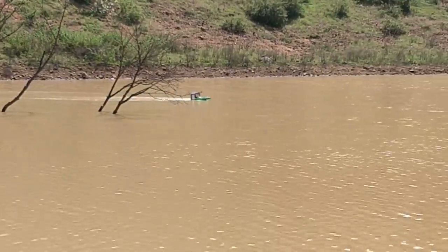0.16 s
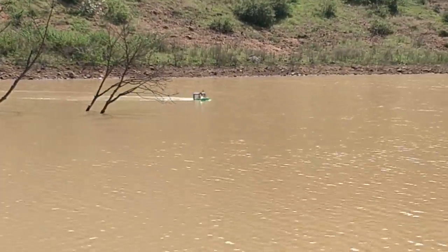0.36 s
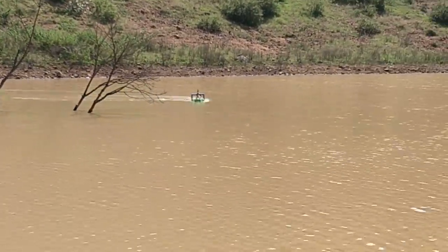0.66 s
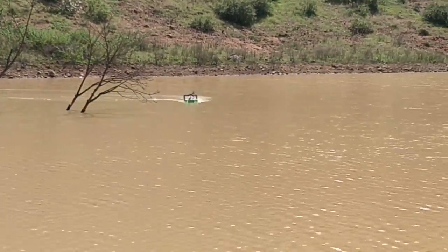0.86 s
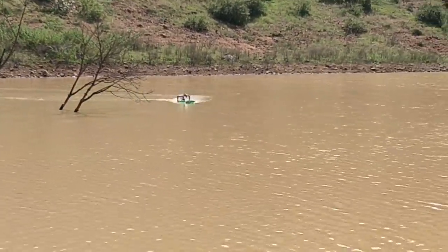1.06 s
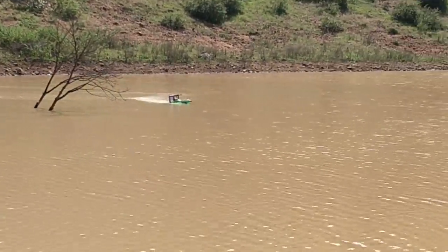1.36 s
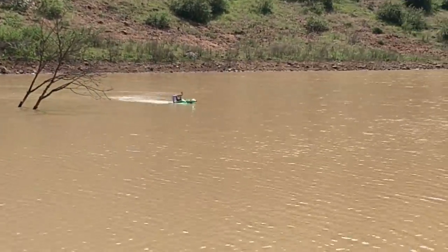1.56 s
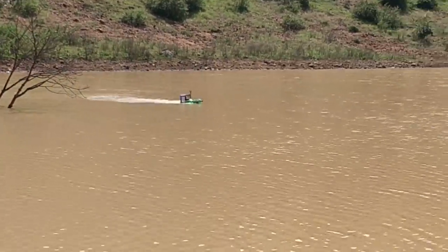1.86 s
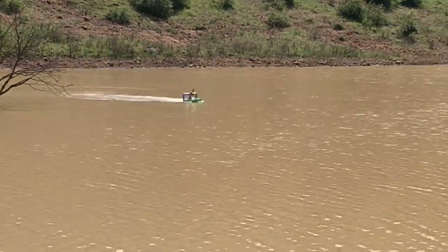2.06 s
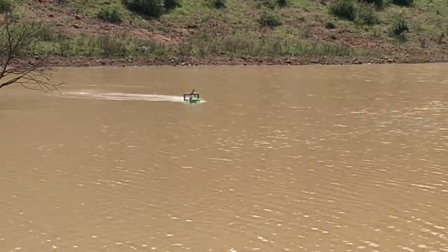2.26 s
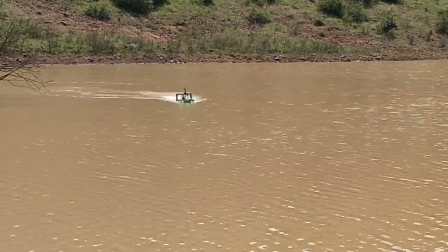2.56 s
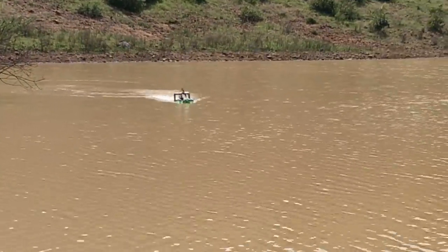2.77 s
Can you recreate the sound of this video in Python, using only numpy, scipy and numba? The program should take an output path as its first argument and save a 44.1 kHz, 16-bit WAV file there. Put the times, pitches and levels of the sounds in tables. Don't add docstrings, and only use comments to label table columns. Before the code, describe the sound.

From the start, a far-off model boat gives a steady electric whine and raspy propeller buzz with airy hiss, shimmering across open water. Pitch climbs slightly from about 0.5 to 2 seconds and loudness grows unevenly, then the speed holds. Small wind flicks touch either side early on; from about 2 seconds gusts thud, with a pop near 2.3 and a rough tear near 2.7.

```python
import sys
import numpy as np
from scipy import signal
from scipy.fft import rfft, irfft, next_fast_len
from scipy.io import wavfile
from scipy.ndimage import uniform_filter1d
from numba import njit

SR = 44100
rng = np.random.default_rng(int(sys.argv[2]) if len(sys.argv) > 2 else 0)


def gain_from_db(level_db):
    decades = np.asarray(level_db, float) / 20
    return 10 ** decades


def bounce(signal):
    frames = np.transpose(np.atleast_2d(signal))
    limited = np.clip(frames, -1, 1)
    pcm = np.round(limited * 32767).astype(np.int16)
    wavfile.write(sys.argv[1], SR, pcm)


N = 127890

# time in seconds, level on the left port in dB, on the right port in dB.
WIND_LEVELS = [(0, -54, -46.5), (.16, -55.5, -51.5), (.35, -66, -60.5), (.62, -58.5, -50.5),
               (.99, -59.5, -53), (1.02, -62, -46.5), (1.09, -70, -32), (1.12, -68, -62.5),
               (1.6, -58, -60.5), (1.99, -59, -60), (2.03, -52, -61), (2.14, -40, -39),
               (2.27, -35.5, -38.5), (2.31, -30.5, -38.5), (2.5, -28, -38), (2.56, -30, -38.5),
               (2.84, -35.5, -48), (2.9, -44, -52)]
LOUD_WIND_DB = -20.5
WEAK_BLADE_DB = -0.5


@njit
def svf(x, hz, q):
    band, low, b, l = np.empty(len(x)), np.empty(len(x)), 0., 0.
    for i in range(len(x)):
        g = np.tan(np.pi * hz[i] / SR)
        v = (b + g * (x[i] - l)) / (1 + g * (g + 1 / q))
        band[i], low[i] = v / q, l + g * v
        b, l = 2 * v - b, l + 2 * g * v
    return band, low


def steady(hz):
    return np.full(N, float(hz))


def unit(x):
    return x / np.sqrt(np.mean(x ** 2))


def walk(rate):
    k = int(SR / rate)
    stairs = np.repeat(rng.standard_normal(N // 100), k)[:N + k]
    return 1.4 * uniform_filter1d(uniform_filter1d(stairs, k), k)[:N]


def curve(table, column):
    table = np.array(table, float)
    return np.interp(np.arange(N) / SR, table[:, 0], table[:, column])


def shape(x, response):
    size = next_fast_len(N + 4096)
    f = np.arange(size // 2 + 1) * SR / size + 1e-3
    return irfft(rfft(x, size) * response(f), size)[:N]


def colour(table, f):
    table = np.array(table, float)
    return gain_from_db(np.interp(np.log(f), np.log(table[:, 0]), table[:, 1]))


def focus(table, when, pitch, octaves):
    total = 0
    for s, length, centre_hz, db in table:
        in_time = (2 * (when - s) / length) ** 4
        in_pitch = (np.log2(pitch / centre_hz) / octaves) ** 2
        total = total + db * np.exp(-in_time - in_pitch)
    return total


def whine(turns, hz, level_db):
    # multiple of shaft speed, level in dB.
    harmonics = [(1, -16.5), (2, 8.5), (3, -15), (4, -2.5), (5, -10.5), (6, -5.5), (7, -16), (8, -4.5),
                 (9, -25.5), (10, -8.5), (11, -19.5), (12, -9.5), (13, -11.5), (14, -12), (15, -20.5),
                 (16, -15.5), (17, -18.5), (18, -18), (19, -24), (20, -22), (21, -17)]
    # middle in seconds, length in seconds, centre in Hz, dB.
    glints = [(0.316, 0.49, 2800, 3.5), (0.502, 0.041, 2320, -15), (0.562, 0.096, 4270, 11.5),
              (0.704, 0.14, 4650, 13), (0.753, 0.034, 2930, 1), (0.977, 0.089, 4200, 11.5),
              (0.945, 0.23, 2400, 5.5), (1.074, 0.062, 2900, 14), (1.168, 0.035, 2580, -16),
              (1.24, 0.26, 1320, 6), (1.295, .16, 2560, 4), (1.312, 0.069, 3180, 7),
              (1.455, 0.19, 3240, 12.5), (1.62, 0.62, 2340, -4.5), (1.645, 0.32, 1260, 0),
              (1.778, 0.29, 3900, 8), (2.006, 0.27, 3100, 3), (2.1, 0.48, 1290, 1.5),
              (2.418, 0.067, 2700, -7), (2.516, 0.027, 2550, 5.5), (2.64, 0.056, 2650, 1),
              (2.729, 0.09, 2830, 11.5), (2.738, 0.021, 4270, 12.5), (2.805, 0.052, 2860, 16.5),
              (1.7, 0.58, 315.3, 7.5), (.6, 0.38, 880, -2), (1.236, 0.24, 930, -2.5), (2.308, 1, 1790, 7.5),
              (1.522, 0.11, 3800, -2.5)]
    whine_db, whine_follows = -8, 0.53
    shimmer_db, shared_db, full_hz, shimmer_rate = 3, 2, 2800, 34
    phase_wander = .6
    out, air = 0, [walk(shimmer_rate / 2) for _ in range(12)]
    when = np.arange(0, N, 64) / SR
    for k, db in harmonics:
        stir = min(k * hz.mean() / full_hz, 1) ** 2
        glint = focus(glints, when, k * hz[::64], octaves=0.44)
        group, part = divmod(k / 3, 1)
        shared = (1 - part) * air[int(group)] + part * air[int(group) + 1]
        fade = stir * (shimmer_db * walk(shimmer_rate) + shared_db * shared)
        fade = fade + np.interp(np.arange(N) / SR, when, glint)
        phase = 2 * np.pi * k * turns + stir * phase_wander * walk(shimmer_rate * 2)
        out = out - gain_from_db(db + fade) * np.cos(phase)
    follows = level_db.mean() + whine_follows * (level_db - level_db.mean())
    return out * gain_from_db(whine_db + follows)


def hiss(turns, level_db, clicks, size_octaves):
    # frequency in Hz, gain in dB.
    hiss_colour = [(700, -7.5), (1500, -7), (2500, -5.5), (4000, -1.5), (6000, -2), (9000, 3.5),
                   (12000, -1.5), (16000, -9.5)]
    # middle in seconds, length in seconds, centre in Hz, dB.
    swells = [(1.07, 0.072, 6900, 5.5), (1.24, 0.32, 5900, 2), (1.3, .26, 10500, 3), (1.54, .3, 8400, -5),
              (1.6, 0.53, 5700, -8), (2.06, 0.27, 10300, 5.5), (2, 0.16, 8700, 1.5),
              (2.21, 0.51, 2900, -1.5), (2.2, 0.05, 11600, 5), (1.2, 0.036, 9500, 7),
              (2.54, 0.78, 2400, -3), (2.73, 0.14, 6100, 0), (2.72, .08, 7700, -5), (.8, .7, 3100, 1.5),
              (0.34, 0.23, 6000, 2.5)]
    hiss_db, slap_db, slap_width, slap_scatter_db = 2, 6.5, 0.11, 6
    flicker_db, swell_db = 2.4, 1
    blade = np.floor(2 * turns).astype(int)
    scatter = np.tanh(rng.standard_normal(N // 20))[blade]
    slap = gain_from_db(slap_scatter_db * scatter + WEAK_BLADE_DB * (blade % 2))
    gate = 1 + gain_from_db(slap_db) * slap * np.exp(-(2 * turns % 1) / slap_width)
    raw = unit(gate * rng.standard_normal(N)) + clicks
    low_hz = hiss_colour[0][0]
    raw = shape(raw, lambda f: colour(hiss_colour, f) / (1 + (low_hz / f) ** 2))
    when = np.arange(0, N, 256) / SR
    out, swell = 0, walk(7.5)
    for centre in np.arange(9, 15, size_octaves)[:22]:
        band = shape(raw, lambda f: np.clip(1 - abs(np.log2(f) - centre) / size_octaves, 0, 1))
        passing = focus(swells, when, 2 ** centre, octaves=0.23)
        passing = np.interp(np.arange(N) / SR, when, passing)
        out = out + band * gain_from_db(flicker_db * walk(20) + swell_db * swell + passing)
    return unit(out) * gain_from_db(level_db + hiss_db)


def cracks(turns):
    jitter_us, drift_us, scatter_db, from_hz = 8, 16, 2, 4400
    chance = rng.standard_normal((N // 20, 2))
    blades = np.arange(1, int(2 * turns[-1]))
    at = np.interp(blades / 2, turns, np.arange(N))
    late_us = jitter_us * chance[blades, 0] + drift_us * walk(28.25)[at.astype(int)]
    at = at + late_us * SR / 10 ** 6
    size = gain_from_db(scatter_db * chance[blades, 1] + WEAK_BLADE_DB * (blades % 2))
    index = np.clip(at.astype(int)[:, None] + np.arange(-8, 9), 0, N - 1)
    click = np.sinc(index - at[:, None]) * np.hanning(19)[1:-1]
    out = np.zeros(N)
    np.add.at(out, index, -size[:, None] * click)
    return unit(shape(out, lambda f: 1 / (1 + (from_hz / f) ** 4)))


def eddies(hz):
    rate, scatter_db, ring = 1400, 2, 1
    evenness = .7
    hits = (rng.random(N) < rate / SR) * gain_from_db(scatter_db * rng.exponential(size=N))
    thud = svf(hits - hits.mean(), hz, ring)[0]
    thud = svf(thud, 1.82 * hz, 0.5)[1]
    thud = svf(thud, 1.82 * hz, 0.52)[1]
    thud = unit(svf(thud, 3.4 * hz, 0.76)[1] / np.sqrt(hz))
    power = uniform_filter1d(uniform_filter1d(thud ** 2, size=200), size=200)
    thud = unit(thud / power ** (evenness / 2))
    return thud + 0.097 * (thud ** 2 - 1)


def pop_and_rip(t):
    pop_s, pop_db, pop_width_ms = 2.3313, -13, .3
    tear_s, tear_width_s, tear_hz, tear_db = 2.708, .009, 1300, -31
    u = (t - pop_s) * 1000 / pop_width_ms
    pop = gain_from_db(pop_db) * (np.exp(-u ** 2 / 2) - 0.42 * np.exp(-u ** 2 / 22))
    rip = svf(rng.standard_normal(N), steady(tear_hz), 1.2)[0]
    rip = unit(svf(rip, steady(tear_hz), 1.2)[0])
    return pop + gain_from_db(tear_db) * rip * np.exp(-((t - tear_s) / tear_width_s) ** 2)


def buffet(port):
    # middle in seconds, length in seconds, level in dB.
    left_puffs = [(0.024, 0.0068, -43), (0.052, 0.0074, -45), (0.124, 0.014, -47.5), (0.413, 0.009, -75),
                  (0.479, 0.014, -55), (0.539, 0.009, -49.4), (0.861, 0.0098, -39.5), (0.958, 0.01, -52),
                  (1.117, 0.015, -45), (1.27, 0.0098, -52), (1.411, 0.014, -49), (1.501, 0.01, -49.5),
                  (1.533, 0.0045, -43), (1.728, 0.0083, -51), (1.76, 0.0084, -47.5), (1.805, 0.011, -46.5),
                  (1.891, 0.035, -46.5), (1.929, 0.012, -55), (2.018, 0.0064, -38), (2.043, 0.018, -36.5),
                  (2.069, 0.007, -38), (2.128, 0.01, -30), (2.181, 0.0041, -31), (2.235, 0.033, -33),
                  (2.317, 0.008, -36), (2.37, 0.043, -27.5), (2.4, 0.0093, -26.5), (2.42, 0.01, -23),
                  (2.459, 0.012, -22), (2.508, 0.0082, -19.5), (2.597, 0.0061, -27), (2.611, 0.0076, -22),
                  (2.627, 0.013, -25.5), (2.643, 0.022, -25.5), (2.725, 0.032, -27.5), (2.797, 0.0054, -52),
                  (2.815, 0.0078, -41), (2.857, 0.01, -30.5)]
    right_puffs = [(0.011, 0.0093, -33.4), (0.036, 0.011, -41), (0.077, 0.0076, -36), (0.138, 0.005, -40),
                   (0.205, 0.016, -48), (0.237, 0.0041, -33.5), (0.255, 0.01, -44), (0.313, 0.013, -45.5),
                   (0.395, 0.012, -49.5), (0.453, 0.026, -47.5), (0.623, 0.0083, -45), (0.66, 0.011, -47.5),
                   (0.692, 0.011, -45.3), (1.027, 0.012, -31.5), (1.047, 0.0041, -30), (1.078, 0.013, -39),
                   (1.166, 0.01, -46.5), (1.228, 0.0082, -48.5), (1.353, 0.0094, -45), (1.379, 0.0087, -45),
                   (1.394, 0.012, -45.5), (1.641, 0.0069, -46), (2.098, 0.011, -36.5),
                   (2.205, 0.012, -28.5), (2.231, 0.009, -43), (2.271, 0.006, -31), (2.288, 0.0079, -37),
                   (2.312, 0.0069, -29.5), (2.332, 0.0051, -19.5), (2.5, 0.028, -31),
                   (2.538, 0.0089, -24.5), (2.579, 0.011, -30.3), (2.598, 0.011, -28), (2.635, 0.011, -31),
                   (2.668, 0.029, -26.5), (2.712, 0.017, -21.5), (2.791, 0.012, -25.5), (2.831, 0.013, -34),
                   (2.895, 0.009, -25.5)]
    flutter_db, flutter_rate, lull_db = 1.5, 70, 2
    eddy_hz, hz_per_db, puff_hz_per_db = 426.5, 5.5, 3
    rumble_hz, rumble_db, rumble_follows = 71.6, -46.5, 0.36
    t = np.arange(N) / SR
    gust_db = curve(WIND_LEVELS, column=1 + port)
    power = gain_from_db(2 * (gust_db + flutter_db * walk(flutter_rate) + lull_db * walk(21.44)))
    for s, length, puff_db in (left_puffs, right_puffs)[port]:
        power = power + gain_from_db(2 * puff_db) * np.exp(-(2 * (t - s) / length) ** 2)
    db = 10 * np.log10(power)
    hz = eddy_hz + hz_per_db * (db - LOUD_WIND_DB) + puff_hz_per_db * (db - gust_db)
    hz = np.clip(hz, 90, 900) * gain_from_db(1.0 * walk(40))
    thud = eddies(hz) * gain_from_db(db)
    low = svf(rng.standard_normal(N), steady(rumble_hz), 0.81)[0]
    low = unit(svf(low, steady(2.24 * rumble_hz), 0.6)[1])
    slow_db = uniform_filter1d(db, size=2000)
    low_db = rumble_db + rumble_follows * (slow_db - LOUD_WIND_DB) + 3.1 * walk(13)
    return thud + port * pop_and_rip(t) + low * gain_from_db(low_db)


def sway():
    sway_hz, sway_db, sway_follows = 60, -52, 0.45
    jolt_s, jolt_width_s, jolt_db = 2.84, 0.12, 8
    gust_db = (curve(WIND_LEVELS, column=1) + curve(WIND_LEVELS, column=2)) / 2
    gust_db = uniform_filter1d(gust_db, size=6000)
    t = np.arange(N) / SR
    deep = shape(rng.standard_normal(N), lambda f: 1 / (1 + (f / sway_hz) ** 2) / (1 + (22 / f) ** 2))
    jolt = jolt_db * np.exp(-((t - jolt_s) / jolt_width_s) ** 2)
    return unit(deep) * gain_from_db(sway_db + sway_follows * (gust_db - LOUD_WIND_DB) + jolt + 2.6 * walk(10))


def over_water(x, port):
    # frequency in Hz, left minus right in dB.
    port_colour = [(700, -6), (1400, 0.5), (2800, -1.2), (5000, 6.5), (9000, 1), (13000, -2.5)]
    port_lag_ms = .022
    mirror_ms, mirror_db, mirror_top_hz = (0.708, 0.7486)[port], (-8, -3)[port], 6950

    def late(f, ms):
        return np.exp(-2j * np.pi * f * ms / 1000)

    def paths(f):
        mirrored = gain_from_db(mirror_db) * late(f, mirror_ms) / (1 + (f / mirror_top_hz) ** 2)
        return colour(port_colour, f) ** (.5 - port) * (late(f, port * port_lag_ms) + mirrored)

    return shape(x, paths)


def scene():
    # time in seconds, shaft speed in Hz.
    shaft_speed = [(0, 280.9), (0.47, 282.9), (0.61, 294.5), (0.83, 295.4), (0.98, 299.1), (1.03, 303.8),
                   (1.12, 304.7), (1.39, 313.7), (1.64, 313.4), (1.77, 319.6), (2.08, 322.8), (2.9, 322)]
    # time in seconds, blade hiss in dB.
    boat_level = [(0.0, -54), (0.45, -50), (0.62, -47), (0.89, -45.5), (1.08, -44), (1.13, -44),
                  (1.39, -44.5), (1.61, -46), (1.77, -47), (2.12, -44.5), (2.22, -43), (2.26, -44.5),
                  (2.33, -42.5), (2.66, -43), (2.74, -37.5), (2.76, -42), (2.83, -38.5), (2.9, -44)]
    crack_db, scattered_db = -.5, -6
    hz, level_db = curve(shaft_speed, column=1), curve(boat_level, column=1)
    turns = np.cumsum(hz * (1 + 0.00055 * walk(22))) / SR
    boat = whine(turns, hz, level_db)
    boat = boat + hiss(turns, level_db, gain_from_db(crack_db) * cracks(turns), size_octaves=0.25)
    out = []
    for port in range(2):
        scattered = gain_from_db(scattered_db) * hiss(turns, level_db, 0, size_octaves=0.86)
        out.append(over_water(boat + scattered, port) + buffet(port))
    return np.array(out) + sway()


def roll_off(x):
    return signal.sosfilt(signal.butter(12, 15850, fs=SR, output="sos"), x)


def record(dry):
    top_hz = 15800
    cut = signal.sosfilt(signal.ellip(8, .2, 60, top_hz, fs=SR, output="sos"), dry)
    return roll_off(cut)


dry = scene()
out = record(dry)
bounce(out)
```